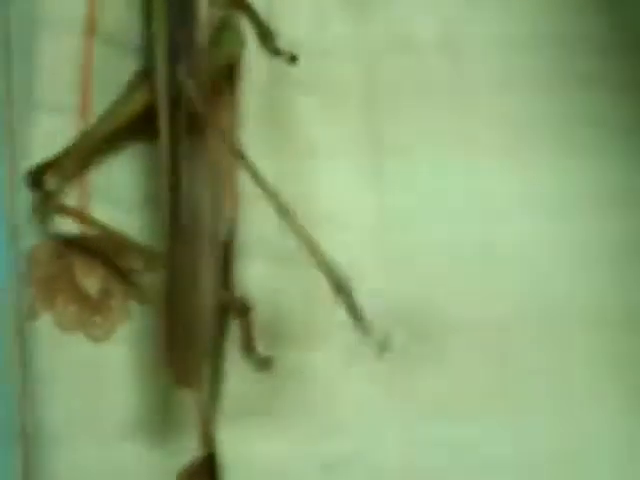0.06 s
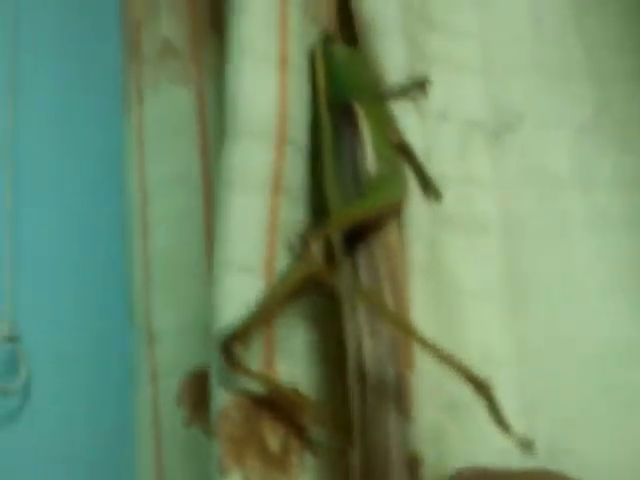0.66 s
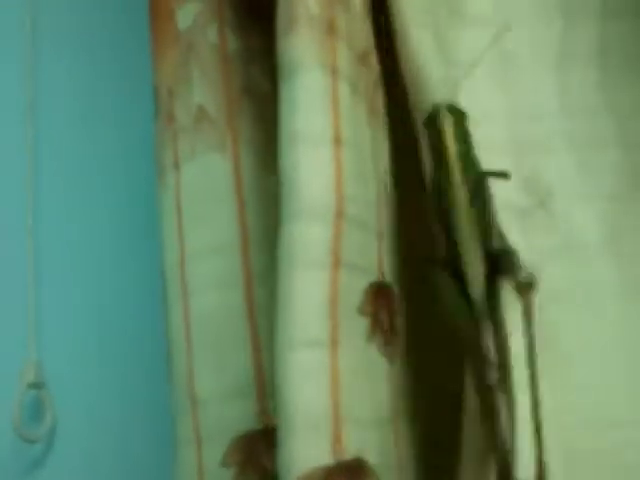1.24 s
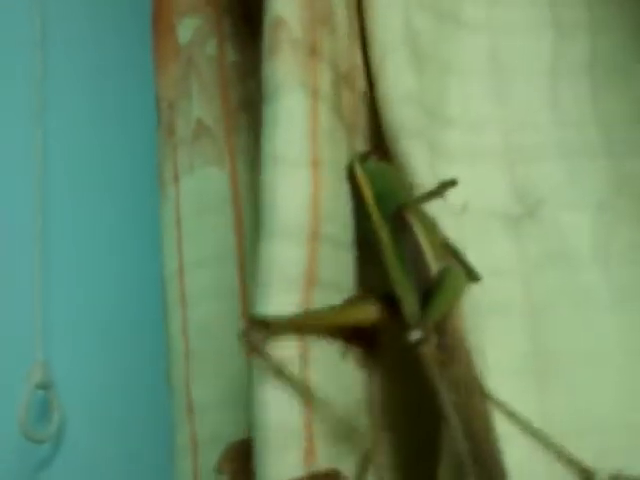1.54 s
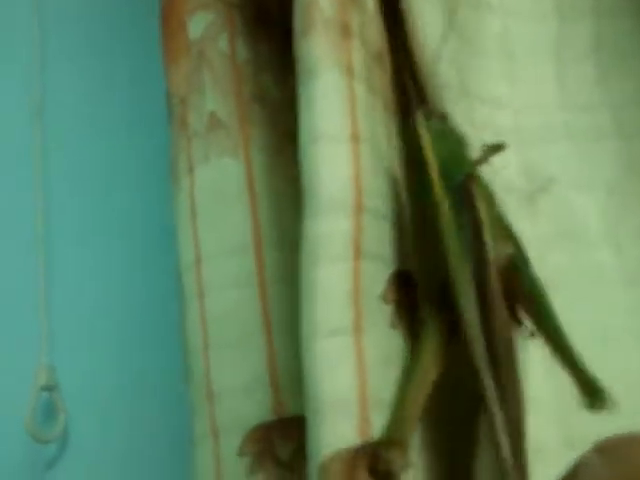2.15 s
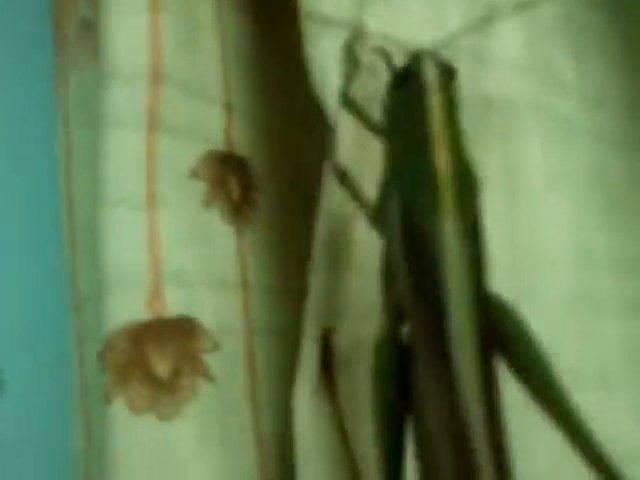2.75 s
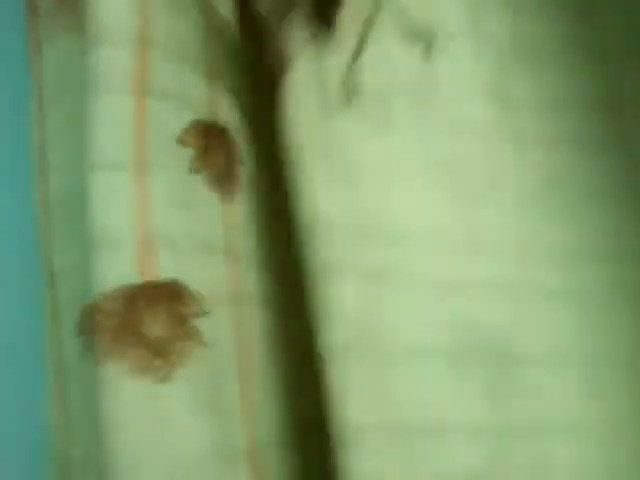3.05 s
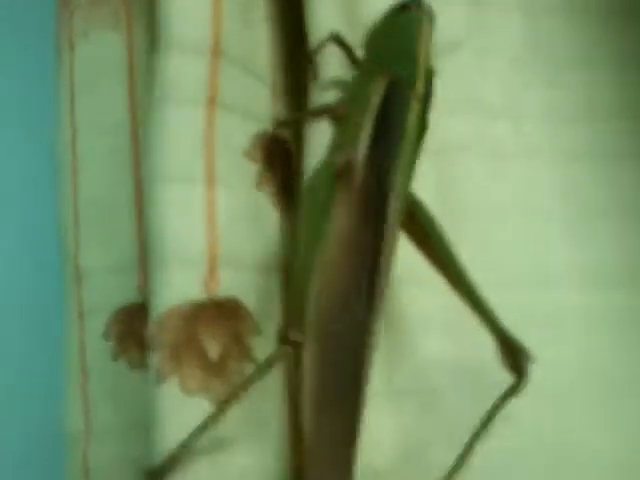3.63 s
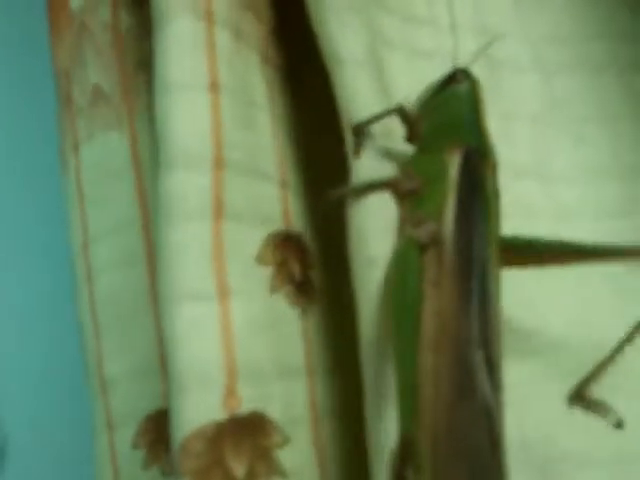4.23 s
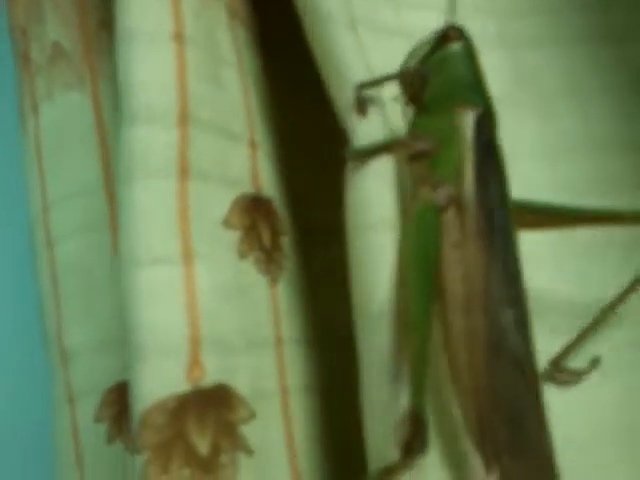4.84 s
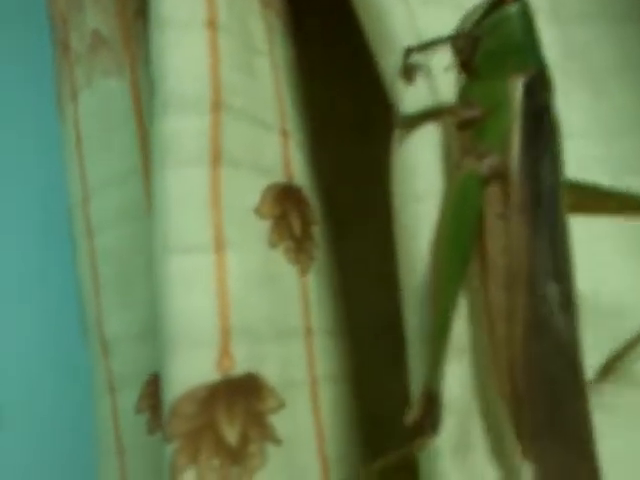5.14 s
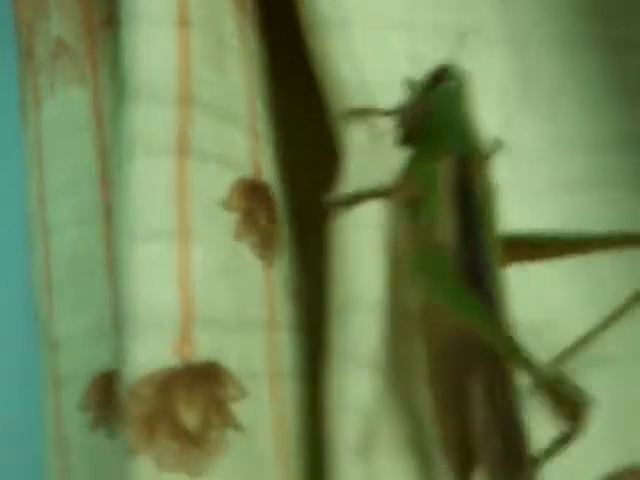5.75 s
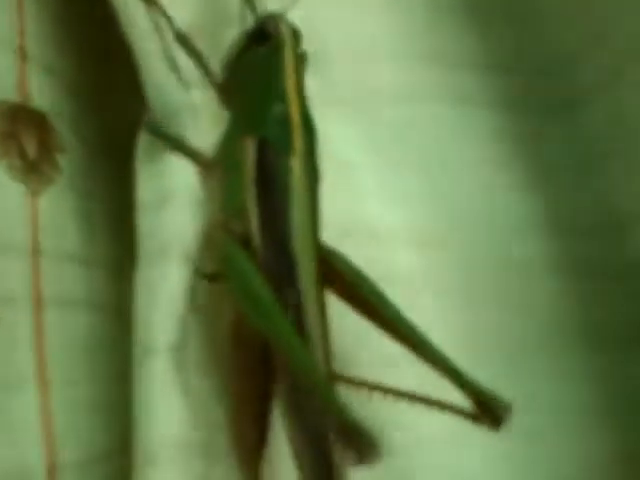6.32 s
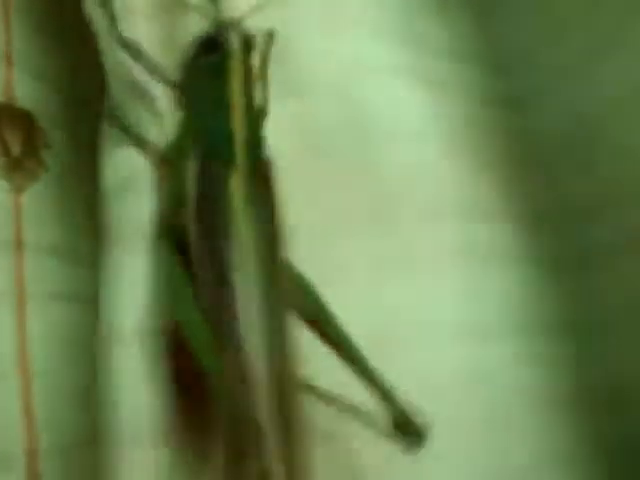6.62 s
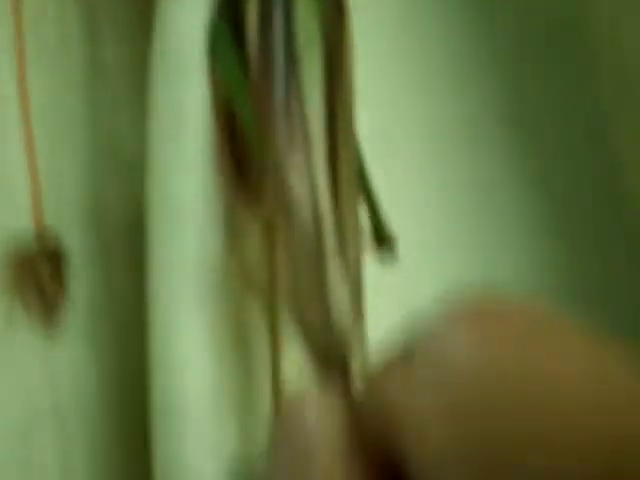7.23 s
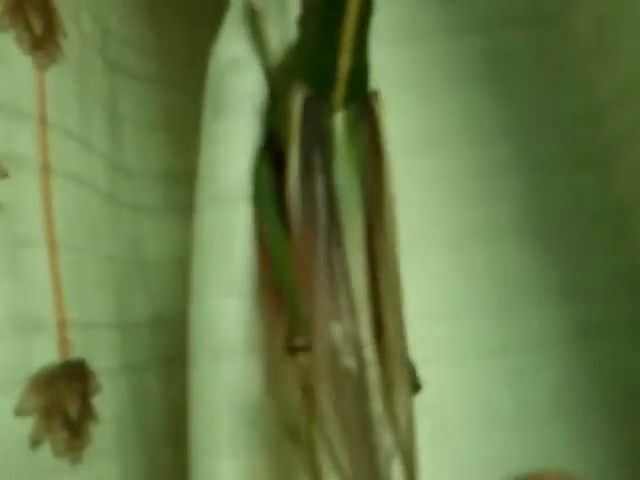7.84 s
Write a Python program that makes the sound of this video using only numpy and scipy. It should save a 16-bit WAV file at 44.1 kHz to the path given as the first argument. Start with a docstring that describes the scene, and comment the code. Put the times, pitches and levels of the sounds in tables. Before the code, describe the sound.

A large grasshopper clicks, taps and kicks on a curtain in two brief flurries, over a low motor hum in a small room.

```python
"""A mains motor hums throughout a small room while a large grasshopper climbs a curtain close by.
First come light taps and the scrape of a claw over the weave. From 2.5 s it kicks and jumps: spines snap
free of threads, each impulse rings the taut cloth, and the curtain flaps and rustles. A lull with one
faint scrape and one step follows, then a second flurry from 6.4 s and a last sharp footfall at 8 s.
The room answers each contact with a short reverberation."""
import sys
import numpy as np
from scipy import signal
from scipy.fft import rfft, irfft, next_fast_len
from scipy.io import wavfile
from scipy.ndimage import map_coordinates

SR = 44100
rng = np.random.default_rng(int(sys.argv[2]) if len(sys.argv) > 2 else 0)


def int16_out(signal):
    """Quantize to a 16-bit WAV file."""
    q = np.round(np.clip(np.atleast_2d(signal).T, -1, 1) * 32767)
    wavfile.write(sys.argv[1], SR, q.astype(np.int16))


N = 356328
TIME = np.arange(N) / SR


def contact(knock_hz, knock_db, tick_db, treble_db, ring_hz, ring_db, ring_width, scratch_t60_s):
    """Source and filter: an impulse and a brief scratch of spines excite the cloth's damped resonance."""
    size, scratch_db, rise_s = 1024, -6, 0.0017
    t = np.arange(size) / SR
    highpass = signal.butter(1, 1400, "high", fs=SR, output="sos")
    common, per_side = rng.standard_normal(size), rng.standard_normal((2, size))
    envelope = amp(-60 * t / scratch_t60_s) * (1 - np.exp(-t / rise_s))
    scratch = signal.sosfilt(highpass, (common + 0.92 * per_side) * envelope)
    force = amp(scratch_db) * scratch / np.linalg.norm(scratch[0])
    force[:, 0] += 1  # the impulse
    colour = [(60, knock_db - 14), (knock_hz * 0.46, knock_db - 4), (knock_hz * 1.1, knock_db),
              (knock_hz * 1.02, knock_db), (2500, tick_db), (8500, treble_db), (15500, treble_db - 12)]
    cloth = minimum_phase(lambda hz: along(colour, hz) + ring_db * bell(hz, ring_hz, ring_width * ring_hz))
    return signal.fftconvolve(force / np.linalg.norm(force[0]), cloth[None], axes=1)


# A foot lands on the cloth. Each row: start in seconds, level at 2.5 kHz in dB, knock and treble in dB
# over that level, ring frequency in Hz, full ring strength in dB, push of air in dB.
FOOTFALLS = [(0.213, -37, 14, -16, 2200, 3, -55), (0.258, -39, 0, -12, 3500, 9, -65),
             (0.2833, -38, -4, -16, 2700, 10, -65), (2.48, -17.5, 17.5, -19, 220, 6.4, -37.5),
             (2.5497, -34, 2, -14, 2200, 9, -60), (2.5601, -28, 17, -4, 4400, 6.4, -43),
             (2.8736, -19.5, 13.5, -18, 200, 10, -41), (2.9430, -12.5, 7, -28, 1500, 7.8, -40),
             (3.0221, -24, 14, -14, 343, 9.8, -42), (3.0372, -22.5, 9, -22, 3260, 7.5, -44),
             (3.066, -29.5, 16, -18, 1090, 9, -48), (3.1765, -19.5, 8, -22, 950, 5.5, -43),
             (3.184, -31, 8, -16, 1400, 3, -55), (3.1925, -34, 4, -8, 5000, 4, -60),
             (5.771, -37, 0, -14, 3400, 8, -65), (6.6396, -28, -1, -16, 2100, 8, -53),
             (6.6773, -18, 2, -15, 2100, 12, -56), (6.682, -11.5, 3, -17.5, 1890, 8.3, -32.5),
             (6.786, -21, 12, -12, 1200, 7.8, -34.5), (8.047, -8, 6.5, -19, 1110, 7.7, -38.5)]

def footfalls(ring_share):
    """Impact on a membrane: slack cloth gives a deep knock, taut cloth a higher ring."""
    out = np.zeros((2, N))
    for start, db, knock_db, treble_db, ring_hz, ring_db, _ in FOOTFALLS:
        tap = contact(knock_hz=444, knock_db=db + knock_db, tick_db=db, treble_db=db + treble_db,
                      ring_hz=ring_hz, ring_db=ring_share * ring_db, ring_width=0.71, scratch_t60_s=0.0068)
        add(out, start, tap)
    return out


# A leg spine tears free of a thread. Each row: start in seconds, level at 2.5 kHz in dB, knock frequency
# in Hz, knock and treble in dB over that level, ring frequency in Hz, full ring strength in dB,
# ring width as a share of its frequency, scratch T60 in seconds.
SPINE_SNAPS = [(2.5695, -10, 400, 1.8, -2.5, 1400, 4, 0.45, 0.0086),
               (2.9416, -8, 700, 8.6, 9.5, 7000, -6, 0.51, 0.004),
               (2.9430, -6, 790, 13.3, 7, 4900, 7.5, 0.6, 0.0088),
               (6.4212, -13.5, 550, 11.5, -2, 2970, 14.5, .65, 0.0059),
               (6.5859, -17.5, 480, 10, 6, 6700, 13.5, 0.45, .004),
               (6.5880, -10.5, 483, 14.7, 5.5, 6850, 9.5, 0.63, 0.0048),
               (6.5918, -15.5, 480, 3.9, 5, 5400, 5, 0.76, 0.008)]

def spine_snaps(ring_share):
    """Sudden release of tension: the kicking hind legs tug the cloth and let go with a bright click."""
    out = np.zeros((2, N))
    for start, db, knock_hz, knock_db, treble_db, ring_hz, ring_db, ring_width, t60_s in SPINE_SNAPS:
        snap = contact(knock_hz, db + knock_db, db, db + treble_db,
                       ring_hz, ring_share * ring_db, ring_width, t60_s)
        add(out, start, snap)
    return out


# The whole curtain swings after a kick. Each row: start in seconds, level in dB.
CURTAIN_SWINGS = [(2.470, -47), (2.571, -42), (3.003, -35), (3.025, -34), (3.061, -40.5), (6.613, -41),
                  (6.699, -43), (6.782, -48)]

def flaps(foot_hz=112, curtain_hz=44.3, damping=1.67):
    """Damped oscillation: the cloth pushes air out and back, quickly under a foot, slowly as a whole."""
    out, t = np.zeros(N), np.arange(SR // 5) / SR
    swing = lambda hz: np.sin(2 * np.pi * hz * t) * np.exp(-damping * (hz * t) ** 2)
    for start, *_, push_db in FOOTFALLS:
        add(out, start, amp(push_db) * swing(foot_hz))
    for start, db in CURTAIN_SWINGS:
        add(out, start, amp(db) * swing(curtain_hz))
    return out


# The spectrum of rubbing fibres. Each row: frequency in Hz, relative level in dB.
FIBRE_SPECTRUM = [(150, -2), (500, -2.5), (1200, 2.5), (2500, 2.5), (5000, 0), (10000, -7), (15000, -11)]
# Wings and body brush the cloth. Each row: start and length in seconds, level in dB,
# treble tilt in dB per octave.
BODY_BRUSHES = [(2.495, 0.055, -66, -3), (2.554, 0.05, -57.5, -5), (2.559, 0.0028, -49, -4),
                (2.5715, 0.0065, -45, 0), (2.954, 0.082, -56, 3.5), (3.002, 0.036, -53.5, -3),
                (3.045, 0.1, -64, -3), (3.157, 0.043, -59.5, -7), (6.422, 0.054, -66, -1),
                (6.6, 0.067, -60.5, 1.5), (6.672, 0.04, -57, -3.5), (6.695, 0.045, -55.5, -11),
                (6.784, 0.0036, -48.5, -3), (6.787, 0.095, -65, -5), (8.065, .02, -47, -9.5)]

def brushes(grain_db=2.5, grains_per_s=1100):
    """Stick-slip friction: fibres catch and let go, making a grainy rustle."""
    out = np.zeros((2, N))
    for start, length, db, tilt_db in BODY_BRUSHES:
        fibres = diffuse(lambda hz: amp(along(FIBRE_SPECTRUM, hz) + tilt_db * np.log2(1 + hz / 1000)))
        grain = amp(grain_db * wobble(grains_per_s))
        out += amp(db) * stroke(start, length) * unit_rms(fibres * grain)
    return out


# A claw drags over the weave. Each row: start and length in seconds, level in dB, band centre in Hz.
CLAW_SCRAPES = [(0.205, 0.085, -75, 3600), (1.892, 0.098, -75, 4000), (4.61, 0.16, -73, 3400)]

def scrapes(grain_db=4.5, threads_per_s=350, relative_width=0.55):
    """Friction on a rough surface: thread after thread modulates a band of treble noise."""
    out = np.zeros((2, N))
    for start, length, db, centre_hz in CLAW_SCRAPES:
        claw = diffuse(lambda hz: bell(hz, centre_hz, relative_width * centre_hz))
        grain = amp(grain_db * wobble(threads_per_s))
        out += amp(db) * stroke(start, length) * unit_rms(claw * grain)
    return out


def grasshopper(ring_share):
    """Superposition of impacts and friction; ring_share scales the decibels of the cloth's ring."""
    return footfalls(ring_share) + spine_snaps(ring_share) + brushes() + scrapes()


# Resonances of the microphone ports. Each row: centre and width in Hz, gain in dB.
PORT_RESONANCES = [(4500, 410, -2), (5330, 450, 0.5), (6500, 710, 2.5), (8400, 770, -2), (10200, 410, 2),
                   (10900, 900, 5.5)]
# The balance of close sounds. Each row: frequency in Hz, left minus right in dB.
NEAR_BALANCE = [(300, 3), (1300, 0), (2800, -6), (5500, -9.5), (8000, -9), (10500, 5), (14000, -4.5)]
# The phase of close sounds. Each row: frequency in Hz, lead of the left port in radians.
NEAR_PHASE_LEAD = [(0, 2), (2070, -0.6), (2580, 2.5), (4740, 1.04), (8010, 4), (9910, 4), (16600, -0.5)]

def near_field(x, gain_db=-1.0):
    """Near-field pickup: a close source rings the ports and reaches each in its own colour and phase."""
    ring_db = lambda hz: sum(db * bell(hz, centre, width) for centre, width, db in PORT_RESONANCES)
    ports = [minimum_phase(lambda hz: ring_db(hz) + side * along(NEAR_BALANCE, hz)) for side in (.5, -.5)]
    coloured = amp(gain_db) * signal.fftconvolve(x, np.array(ports), axes=1)[:, :N]
    return filtered(coloured, lambda hz: np.exp(1j * np.outer([.5, -.5], along(NEAR_PHASE_LEAD, hz))))


# The room's reverberation time. Each row: frequency in Hz, T60 in seconds.
ROOM_T60 = [(200, 0.14), (1500, 0.3), (5000, 0.28), (12000, 0.13)]

def room(x, wall_s=0.025, wall_db=5, rise_s=0.00048):
    """Reverberation: a diffuse tail decays exponentially, swelling where the far wall's echo returns."""
    hz, t, noise = signal.stft(rng.standard_normal((2, SR // 2)), SR, nperseg=256)
    echo_db = wall_db * np.exp(-((t - wall_s) / 0.0021) ** 2)
    decay_db = -60 * t / along(ROOM_T60, hz)[:, None]
    tail = signal.istft(noise * amp(echo_db + decay_db), SR, nperseg=256)[1]
    tail *= 1 - np.exp(-np.arange(tail.shape[1]) / SR / rise_s)
    return signal.fftconvolve(x.mean(0)[None], tail / np.linalg.norm(tail[0]), axes=1)[:, :N]


# Shaft orders and mains harmonics. Each row: frequency in Hz, rms level in dB.
MOTOR_PARTIALS = [(48.9, -57), (99.8, -65), (146.9, -65), (196.2, -67.5), (199.7, -64), (392, -72.5),
                  (441, -85), (490, -98), (539, -74), (588, -78.5), (637, -87)]

def motor(waver_db=0.75, drift_radians=0.26):
    """Periodic forcing: shaft and mains give spectral lines, slightly unsteady in level and phase."""
    out = np.zeros(N)
    for hz, db in MOTOR_PARTIALS:
        peak = np.sqrt(2) * amp(db + waver_db * wobble(2.956))
        phase = 2 * np.pi * (hz * TIME + rng.random()) + drift_radians * wobble(1.94)
        out += peak * np.sin(phase)
    return out


# The room's hush. Each row: frequency in Hz, relative spectral density in dB.
HUSH_SPECTRUM = [(12, -41), (20, -3.5), (42, -5.5), (75, -7), (140, -9.5), (171, -10.5), (210, -7),
                 (260, -10), (420, -16), (700, -22), (1100, -22.5), (1800, -29.5), (3500, -34),
                 (7000, -37.5), (15000, -40)]
# Room modes kept sounding by the motor. Each row: centre and width in Hz, rms level in dB.
ROOM_MODES = [(44.4, 13.5, -60), (62.7, 9.4, -63.5), (130.3, 38, -64), (224.6, 28, -64.5), (282.4, 39, -69)]
# The balance of the background. Each row: frequency in Hz, left minus right in dB.
BACKGROUND_BALANCE = [(60, -2), (180, -1.5), (550, 1.5), (1650, -1), (4970, 0), (15000, 1)]

def background(hush_db=-56, swell_db=0.1):
    """Standing waves drone as narrow bands of noise beside the motor's hum and a broadband hush."""
    hush = amp(hush_db + swell_db * wobble(5.04)) * diffuse(lambda hz: amp(along(HUSH_SPECTRUM, hz)))
    modes = sum(amp(db) * diffuse(lambda hz: bell(hz, centre, width)) for centre, width, db in ROOM_MODES)
    balance = lambda hz: amp(np.outer([.5, -.5], along(BACKGROUND_BALANCE, hz)))
    return filtered(hush + modes + motor(), balance)


# The likeness of left and right. Each row: frequency in Hz, correlation from -1 to 1.
COHERENCE = [(60, 0.44), (150, 0.92), (380, 0.64), (950, 0.44), (2380, -0.16), (5980, 0.036),
             (15000, -0.014)]

def diffuse(gain):
    """A diffuse field: stereo noise of rms 1, shaped by gain(hz) and most coherent in the bass."""
    angle = lambda hz: np.arccos(np.clip(along(COHERENCE, hz), -1, 1)) / 2
    noise = rng.standard_normal((2, N))
    mid, side = filtered(noise, lambda hz: gain(hz) * [np.cos(angle(hz)), np.sin(angle(hz))])
    return unit_rms(np.array([mid + side, mid - side]))


def stroke(start, length):
    """The amplitude envelope of a rub: a fast swell and a slower fade."""
    progress = np.clip((TIME - start) / length, 0, 1)
    return np.abs(np.sin(np.pi * np.sqrt(progress))) ** .5


def wobble(knots_per_s):
    """Random modulation: a smooth curve through Gaussian knots."""
    knots = rng.standard_normal(int(N * knots_per_s / SR) + 4)
    return map_coordinates(knots, [TIME * knots_per_s])


def bell(hz, centre, width):
    """A Lorentzian resonance curve of height 1."""
    return 1 / (1 + (2 * (hz - centre) / width) ** 2)


def minimum_phase(curve_db, size=2048):
    """Causality: folding the cepstrum turns a dB curve into a minimum-phase impulse response."""
    cepstrum = irfft(np.log(amp(curve_db(np.fft.rfftfreq(size, 1 / SR)))))
    cepstrum[1:size // 2] *= 2
    cepstrum[size // 2 + 1:] = 0
    return irfft(np.exp(rfft(cepstrum)))


def filtered(x, response):
    """Linear filtering: the spectrum of x times response(hz)."""
    size = next_fast_len(N + SR // 2)
    return irfft(rfft(x, size) * response(np.fft.rfftfreq(size, 1 / SR)), size)[..., :N]


def along(points, hz):
    """Interpolation of (Hz, value) points on a logarithmic frequency axis."""
    frequencies, values = np.transpose(points)
    return np.interp(np.log(hz + 1), np.log(frequencies + 1), values)


def amp(db):
    """The amplitude ratio of a level in decibels."""
    return 10 ** (np.asarray(db) / 20)


def unit_rms(x):
    """Normalisation to rms 1."""
    return x / np.sqrt(np.mean(x ** 2) + 1e-20)


def add(track, start, sound):
    """Superposition of a sound on a track, from start in seconds."""
    remaining = track[..., round(start * SR):][..., :sound.shape[-1]]
    remaining += sound[..., :remaining.shape[-1]]


def scene():
    """Direct sound, reverberation and background add; little of the cloth's ring reaches the room."""
    direct = near_field(grasshopper(ring_share=0.96))
    air_pushes = flaps() * amp([[-1], [1]])  # a little to the right
    reverberation = amp(-15.0) * room(grasshopper(ring_share=0.12))
    return direct + air_pushes + reverberation + background()


def record(dry, cutoff_hz=15850, transition_hz=200):
    """Band limiting: a steep low-pass removes the highest treble."""
    return filtered(dry, lambda hz: np.clip((cutoff_hz - hz) / transition_hz + .5, 0, 1))


dry = scene()
out = record(dry)
int16_out(out)
```